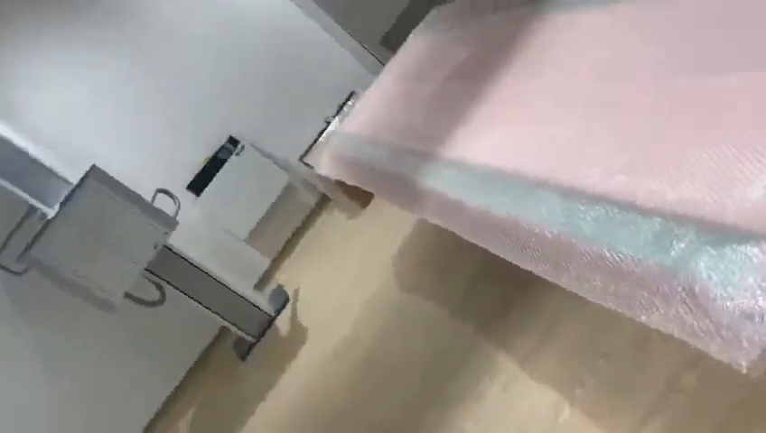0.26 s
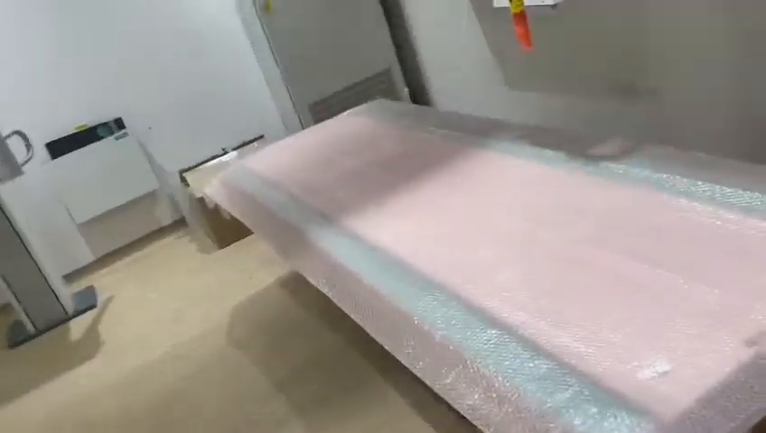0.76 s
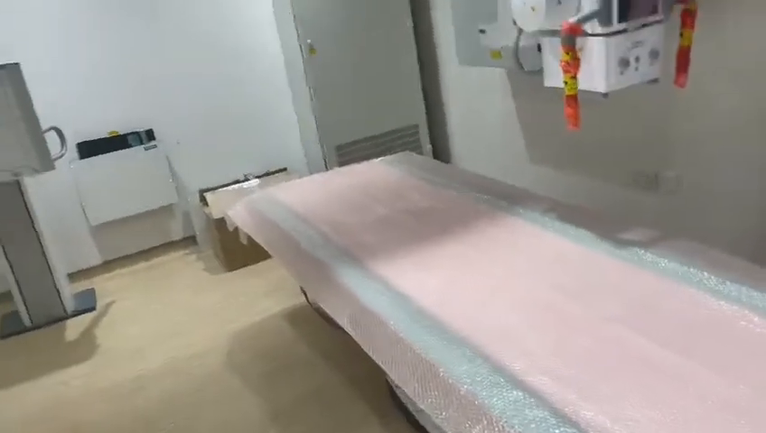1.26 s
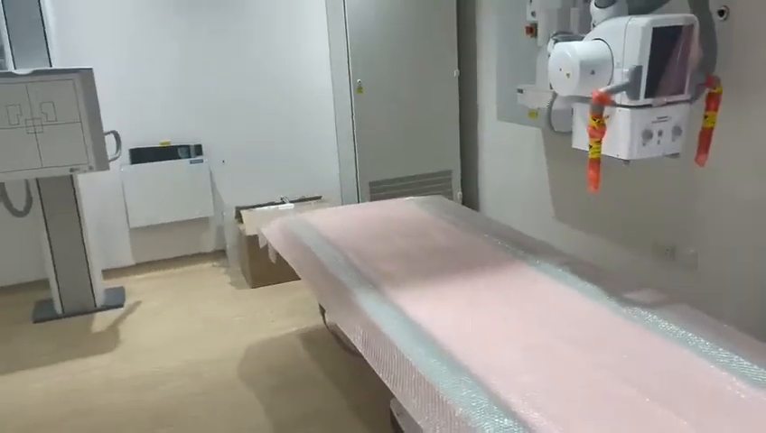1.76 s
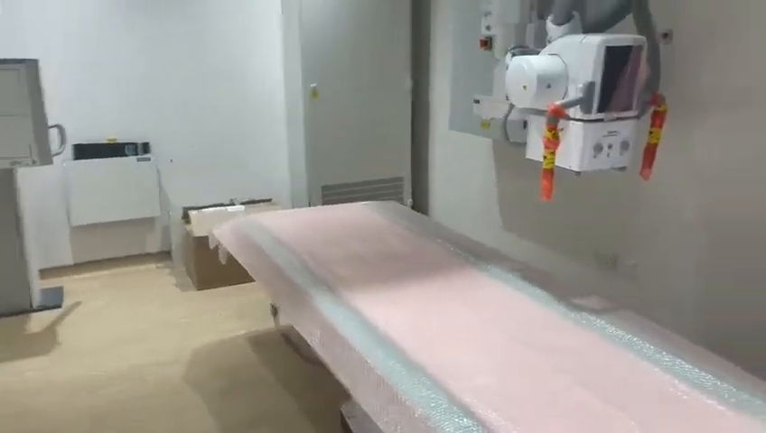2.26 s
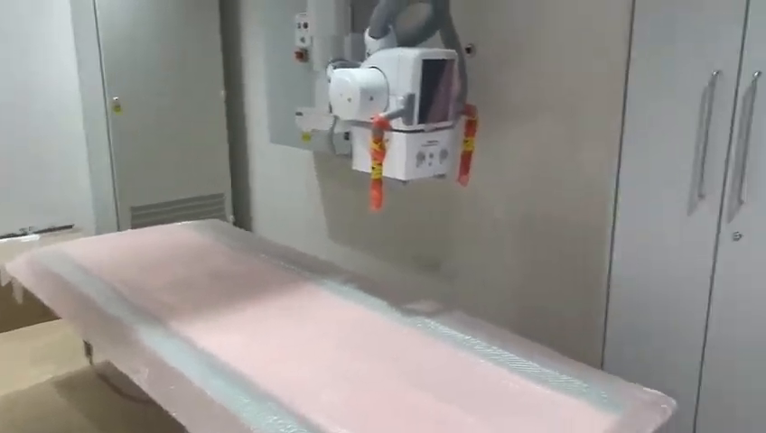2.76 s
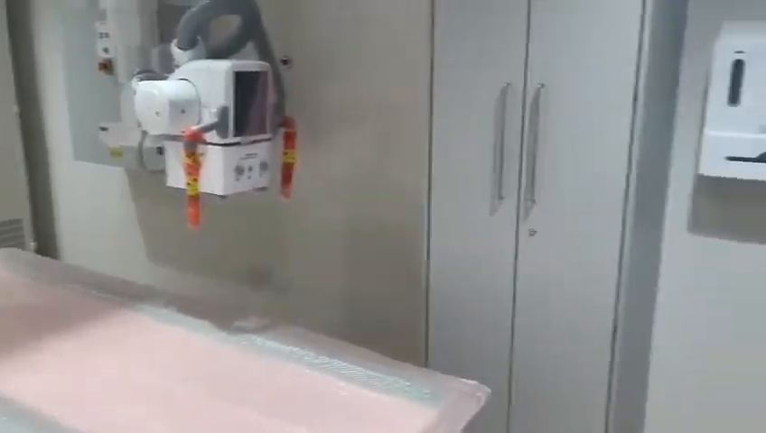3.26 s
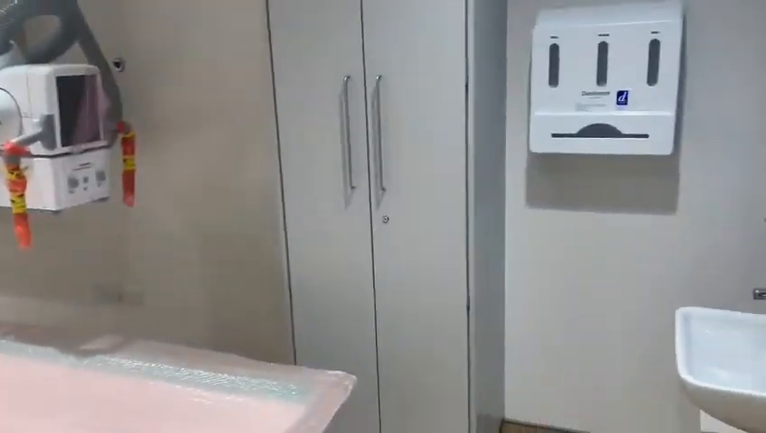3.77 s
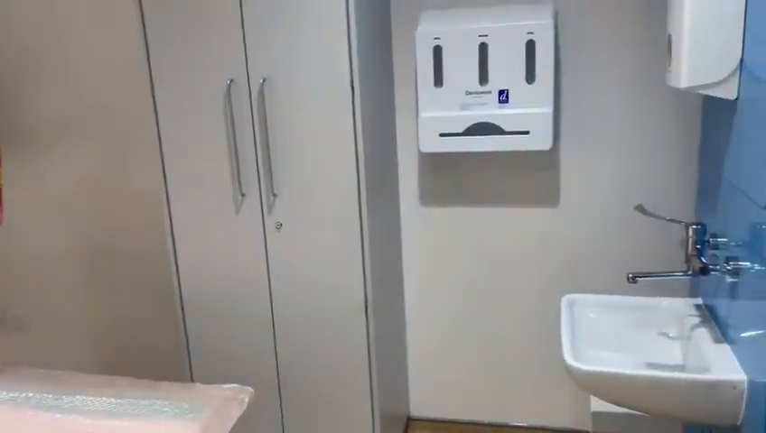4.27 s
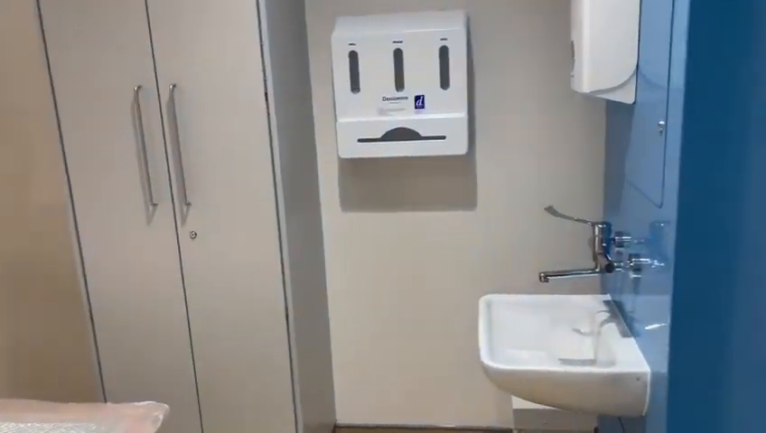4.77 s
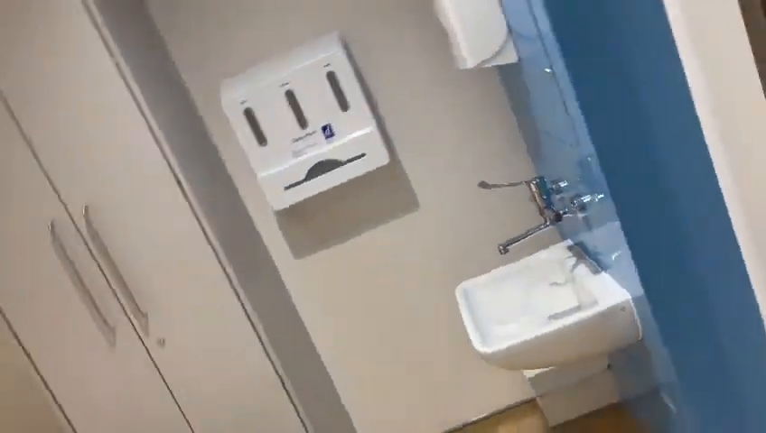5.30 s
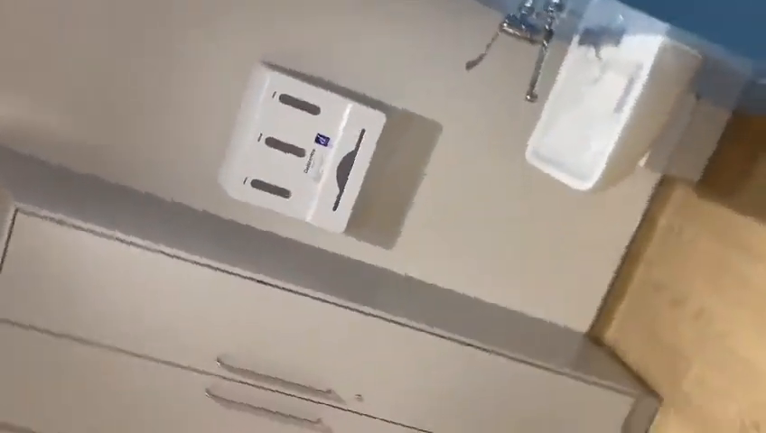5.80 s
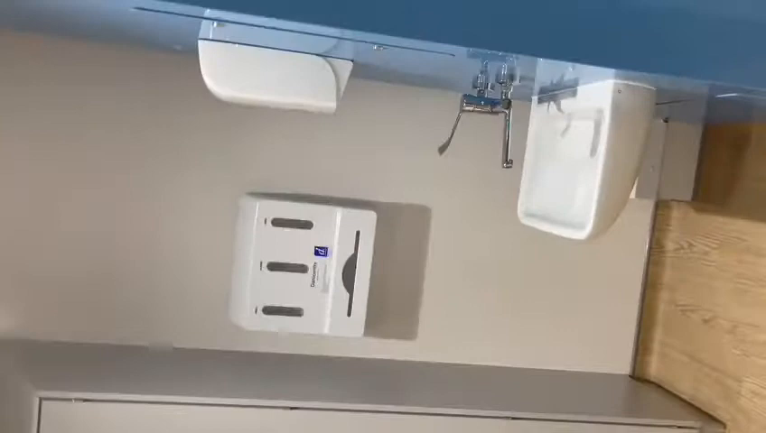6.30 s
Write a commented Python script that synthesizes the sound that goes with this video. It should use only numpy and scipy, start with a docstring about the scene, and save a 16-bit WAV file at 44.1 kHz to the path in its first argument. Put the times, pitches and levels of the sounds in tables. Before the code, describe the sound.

Ventilation hums under light phone handling, then a heavy door clicks and slams with a boom and short echo in a small room.

```python
"""Ventilation hums, sleeves rustle, and a phone rumbles and is tapped as it turns in the hand.
About four seconds in, a heavy door swings shut in a small room with hard walls. Its latch
ticks and scrapes over its plate, then the door slams and rattles. The blows make the door
boom and its metal fittings ring, and the room answers with a short echo."""
import sys
import numpy as np
from scipy import signal
from scipy.fft import rfft, irfft
from scipy.io import wavfile
from scipy.ndimage import uniform_filter1d

SR = 44100
rng = np.random.default_rng(int(sys.argv[2]) if len(sys.argv) > 2 else 0)


def wav_out(sig):
    """Save sig, one row per channel (or a flat mono array), as 16-bit PCM at SR to the path in sys.argv[1]."""
    wavfile.write(sys.argv[1], SR, np.round(np.clip(np.atleast_2d(sig).T, -1, 1) * 32767).astype(np.int16))


N = 288546
T = np.arange(N) / SR
RING_T = T[:int(1.3 * SR)]  # time since a hit, in seconds

# A "colour" says how strong a noise is at each pitch. A fade_s is the time to drop by 60 dB.
# how alike the two microphones hear a sound: pitch_hz, likeness (1 = the same)
LIKENESS = [(60, 0.95), (95, 1), (135, 0.97), (270, 0.91), (520, 0.056), (1200, 0.19), (2600, 0.53),
            (4200, 0.7), (6500, 0.73), (9000, 1)]
# the ventilation grows as the phone turns towards it: time_s, level_db
VENT_LEVEL = [(0, -49), (2.3, -49.5), (5.3, -45), (6.54, -46.5)]
# colour of the air in the ducts: pitch_hz, level_db
AIR_COLOUR = [(25, -20), (50, -7.5), (66, -1), (85, 0.5), (108, -0.5), (140, 2), (180, -4), (220, -2),
              (330, -7.5), (480, -11.5), (700, -19.5), (1300, -22.5), (2000, -29.5), (3200, -39),
              (6000, -67.5), (12000, -71.5)]
# fan tones: pitch_hz, level_db (compared with VENT_LEVEL)
FAN_TONES = [(136, -1), (205, -4)]
# hollow notes of the ducts: pitch_hz, width_hz, level_db (compared with VENT_LEVEL)
DUCT_NOTES = [(500, 120, -18), (833, 280, -17.5), (1191, 560, -15)]

# sleeve strokes as the arm turns: fastest_s, rise_s, fall_s, rustle_db, fizz_db
SLEEVE_STROKES = [(0.015, 0.026, 0.057, -60, -60.5), (0.18, 0.348, 0.066, -60, -74),
                  (0.402, 0.13, 0.059, -58.5, -61), (0.524, 0.054, 0.061, -55.5, -64),
                  (0.634, 0.144, 0.06, -57.5, -56.0), (0.829, 0.064, 0.035, -58.5, -67),
                  (0.95, 0.13, 0.28, -63.5, -64), (1.15, 0.041, 0.032, -68, -64),
                  (1.283, 0.053, 0.088, -55.5, -59.5), (1.415, 0.026, 0.081, -53.0, -55.5),
                  (1.585, 0.068, 0.047, -57.5, -60.5), (1.665, 0.014, 0.038, -63, -69),
                  (1.835, 0.11, 0.15, -55.5, -60.5), (2.017, 0.257, 0.43, -62.5, -83),
                  (2.26, 0.24, 0.038, -64, -69.5), (2.46, 0.349, 0.153, -66.0, -94),
                  (2.802, 0.16, 0.2, -60.5, -78), (2.86, 0.013, 0.052, -55, -86),
                  (3.24, 0.45, 0.63, -67.0, -88), (3.672, 0.041, 0.035, -64.0, -69),
                  (5.235, 0.04, 0.22, -55.5, -52.5), (5.49, 0.17, 0.17, -59.5, -64),
                  (5.76, 0.28, 0.18, -60, -63), (5.849, 0.038, 0.018, -57, -57.5),
                  (5.993, 0.057, 0.062, -52.5, -58.5), (6.136, 0.044, 0.03, -62, -67),
                  (6.242, 0.059, 0.21, -64.5, -66.5), (6.469, 0.17, 0.031, -59, -60.5)]
# colour of rubbing cloth: pitch_hz, level_db
CLOTH_COLOUR = [(500, 16.5), (1400, 9.5), (2200, 8), (3400, 3), (4500, 2), (6600, -0.5), (8400, -8.5),
                (9300, -7), (10800, -17), (11400, -19), (11900, -36)]
# colour of fibres in a brisk stroke: pitch_hz, level_db
FIZZ_COLOUR = [(4000, -12), (6500, -5.5), (8300, 4), (9500, 2), (11500, 5), (11900, -44)]
# the hand shifts its grip: start_s, length_s, level_db
GRIP_SHIFTS = [(.17, 0.11, -51), (.5, 0.069, -49), (.72, 0.13, -47), (.95, 0.023, -36.5), (1.1, 0.13, -49),
               (1.25, 0.153, -45), (1.48, 0.12, -51.5), (1.76, 0.03, -42), (1.83, 0.044, -41)]
# taps on the case: start_s, level_db, first_hz, last_hz, swell_s, tick_db, pan_db, left_delay_s
FINGER_TAPS = [(.1785, -37, 1900, 620, 0.0012, -35.5, 2, 0.00028),
               (0.2437, -24, 1310, 290, 0.00077, -35, 8, 0.00042),
               (.248, -25, 190, 97, 0.0052, -70, 0, 0.00023),
               (1.254, -26, 764, 568, 0.0017, -63, 9.5, 0.00081),
               (5.5661, -16, 1620, 487, 0.0017, -31, 7.5, 0.00034),
               (5.7278, -34.5, 754, 600, 0.0014, -49, 11, 0.001),
               (6.0162, -46.5, 2040, 882, 0.0014, -34.5, -10, 0.0023),
               (6.2618, -33, 2940, 1900, 0.00035, -34.5, -5, 0.00057)]
# ringing notes of the phone's case: pitch_hz, level_db, fade_s
CASE_NOTES = [(378, -2.5, 0.026), (750, -2.5, .013), (1970, -8.5, 0.006), (2740, -10, 0.012),
              (3830, -10, 0.007)]

# how long the room echoes: pitch_hz, fade_s
ECHO_FADE = [(100, 1), (400, 0.74), (1200, 0.64), (3000, 0.5), (5500, 0.45), (9000, 0.31), (11500, 0.15)]
# colour of the slam's echo off the walls: pitch_hz, level_db
WALL_COLOUR = [(60, 3.5), (150, 7), (300, -4), (520, -3), (760, -9), (1100, -7), (1750, -15.5),
               (2300, -21.5), (3000, -18.5), (3700, -25), (5000, -14), (7000, -35.5), (9200, -2),
               (9800, -18), (10700, -29), (11500, -34)]
# the case shades the microphones from the door: pitch_hz, left_minus_right_db
CASE_SHADE = [(100, -4), (350, -4), (630, -6.5), (1130, -5), (2000, -0.5), (3700, 5), (5200, 13),
              (6600, 8.5), (11000, 1.5)]
# ringing notes of the door's skin and metal fittings: pitch_hz, level_db, fade_s
FITTING_NOTES = [(384.6, -18.5, 0.1), (566.5, -25.5, 0.28), (923, -35, 0.39), (1012, -26, 0.33),
                 (1107, -18, 0.17), (1200, -27.5, 0.25), (1242, -29.5, 0.21), (1515, -26, .24),
                 (1622, -25.5, 0.27), (1722, -20, 0.31), (1803, -17.5, 0.2), (2730, -42.5, 0.42),
                 (2940, -33.5, 0.3), (3440, -27.5, 0.18), (4339, -31.5, .33), (4780, -30.5, .35),
                 (4780, -35, 0.49), (5480, -32.5, 0.36), (5650, -36, 0.3), (7400, -40, 0.26),
                 (8600, -36, .28), (8550, -28.5, .28), (9200, -35.5, 0.33), (9300, -36, 0.26),
                 (10700, -32, 0.21), (10800, -24.5, 0.15)]

# metal meets metal in the latch: start_s, level_db
LATCH_CLICKS = [(3.853, -26), (3.878, -39.5), (4.026, -35.5), (4.0322, -26), (4.038, -32), (4.0552, -24),
                (4.068, -32.5), (4.1082, -1), (4.1122, -6.5)]
# colour of those clicks: pitch_hz, level_db
CLICK_COLOUR = [(200, -30), (1000, -3.5), (2100, -1), (3600, -5.5), (5000, -1.5), (7000, -3.5), (9200, 4.5),
                (9800, -6.5), (10700, 7), (11600, -6)]
# the bolt slides over its plate: time_s, level_db
BOLT_SCRAPE = [(3.99, -74.5), (4.012, -39.5), (4.03, -33.5), (4.055, -29.5), (4.075, -27), (4.096, -39)]
# colour of the door as a sounding board for the bolt: pitch_hz, level_db
BOARD_COLOUR = [(200, -14), (600, 0.5), (1000, 4.5), (1500, -4.5), (2400, -12.5), (3500, -23), (11000, -46)]

# air squeezed through the closing gap: time_s, level_db
AIR_PUSH = [(3.95, -67.5), (4.04, -36.5), (4.075, -25.5), (4.10, -32), (4.13, -56.5)]
# the door's edge presses into its stop and bounces: start_s, pitch_hz, level_db
EDGE_KNOCKS = [(4.1043, 417, -10.5), (4.1173, 385, -27), (4.228, 400, -33), (4.242, 440, -28),
               (4.257, 480, -33)]
# deep notes of door and room: pitch_hz, level_db, fade_s, rise_s
BOOM_NOTES = [(43.6, -24, 0.63, .012), (64.8, 5, 0.41, 0.13), (73, -4.5, 0.25, 0.015),
              (89.74, 0, 0.34, 0.024), (132, -6, 0.14, 0.018), (158.7, -28, 0.54, .004),
              (249, -5.5, 0.11, 0.0061)]
# colour of wall and floor shaking: pitch_hz, level_db
THUD_COLOUR = [(22, -28), (45, -3), (62, 11.5), (100, -15.5), (170, -14), (300, -23), (600, -39.5),
               (2000, -73)]
# colour of a blow's hard crack: pitch_hz, level_db
CRACK_COLOUR = [(100, -3), (380, -3.5), (520, -7.5), (740, -7), (1100, 2), (1380, -10), (1680, 1),
                (1950, -12.5), (2300, -20), (3000, -11.5), (3650, -24), (4500, -9), (7000, -27),
                (9000, -24.5), (10700, -31.5), (11500, -35)]
# the door hits its frame: start_s, crack_db, boom_db
DOOR_BLOWS = [(4.1012, -15, -17), (4.1048, -20.5, -4.5), (4.1106, 2, 4.5), (4.1191, -12.5, -23.5),
              (4.2254, -28, -26), (4.2336, -31.5, -8.5), (4.2581, -24, -34), (4.3846, -48.5, -37),
              (4.405, -50, -26.5)]


def gain(db):
    """Turn decibels into a number to multiply by."""
    return 10 ** (np.asarray(db) / 20)


def curve(rows):
    """A gain that follows (time_s, level_db) rows and is zero outside them."""
    s, db = np.transpose(rows)
    return gain(np.interp(T, s, db)) * (T >= s[0]) * (T <= s[-1])


def at_hz(rows, hz):
    """Read between (pitch_hz, value) rows, spacing octaves evenly."""
    pitches, values = np.transpose(rows)
    return np.interp(np.log(hz + 1), np.log(pitches), values)


def pan(db):
    """Two gains that make the left side db louder than the right."""
    return gain(np.array([[db], [-db]]) / 2)


def wander(per_s):
    """A smooth random wobble that heads for a new value per_s times a second."""
    hold = int(SR / per_s)
    steps = np.repeat(rng.standard_normal(N // hold + 1), hold)
    return uniform_filter1d(uniform_filter1d(steps, hold), hold)[:N]


def noise(colour, size=N):
    """Stereo noise of a given colour, partly shared by the two microphones."""
    hz = np.fft.rfftfreq(size, 1 / SR)
    alike = np.clip(at_hz(LIKENESS, hz), 0, 1)
    shared, side = rfft(rng.standard_normal((2, size))) * gain(at_hz(colour, hz))
    x = irfft(shared * np.sqrt(1 + alike) + np.array([[1], [-1]]) * side * np.sqrt(1 - alike), size)
    return x / x.std()


def fade(fade_s):
    """A gain that drops by 60 dB every fade_s seconds."""
    return gain(-60 * RING_T / fade_s)


def strikes(times_s, levels_db):
    """One sharp push for each hit."""
    force = np.zeros(N)
    force[(np.asarray(times_s) * SR).astype(int)] = gain(levels_db)
    return force


def play(force, sound):
    """Start a copy of the sound at every push, as strong as that push."""
    return signal.fftconvolve(force[None], sound, axes=1)[:, :N]


def ventilation():
    """Air rushes dully through the ducts, fan tones waver and hollow notes swell at random."""
    air = noise(AIR_COLOUR) * gain(2 * wander(17))
    hum = hollow = 0
    for hz, db in FAN_TONES:
        level = gain(db + 3.7 * wander(10))
        wavering_hz = hz + 2.46 * wander(12)
        hum += level * np.sin(2 * np.pi * np.cumsum(wavering_hz) / SR)
    for hz, width_hz, db in DUCT_NOTES:
        rush = noise([(hz / 2, -20), (hz, 0), (hz * 2, -20)])
        note = signal.lfilter(*signal.iirpeak(hz, hz / width_hz, fs=SR), rush)
        hollow += note / note.std() * gain(db + 6.6 * wander(9))
    overall = gain(np.interp(T, *np.transpose(VENT_LEVEL)))
    return overall * (gain(3.5) * air + hum + hollow) * pan(-0.5)


def cloth_folds():
    """Cloth noise whose half-octave bands swell and fade as the folds move."""
    spectrum = rfft(noise(CLOTH_COLOUR))
    band = 2 * np.log2(np.clip(np.fft.rfftfreq(N, 1 / SR), 2000, 8000) / 2000)
    bands = (irfft(spectrum * np.maximum(1 - abs(band - k), 0), N) for k in range(5))
    return sum(x * gain(1.5 * wander(22)) for x in bands)


def sleeves():
    """Cloth rubs in uneven strokes that speed up and slow down; brisk ones add a bright fizz."""
    power = np.zeros((2, N))
    for fastest_s, rise_s, fall_s, rustle_db, fizz_db in SLEEVE_STROKES:
        width_s = np.where(T < fastest_s, rise_s, fall_s)
        speed = np.exp(-np.minimum(abs(T - fastest_s) / width_s, 10) ** 2)
        power += (gain([[rustle_db], [fizz_db]]) * speed) ** 2
    rustle_level, fizz_level = np.sqrt(power) * gain(1.45 * wander(120) + 0.93 * wander(24.79))
    rustle = gain(0.15) * rustle_level * cloth_folds()
    fizz = fizz_level * gain(1.3 * wander(45)) * noise(FIZZ_COLOUR)
    return (rustle + fizz) * pan(0.77)


def grip(rise_s=0.028, fall_s=0.023):
    """Each shift of the hand shakes the phone: a rumble swells, holds and dies away."""
    power = np.zeros(N)
    for start_s, length_s, db in GRIP_SHIFTS:
        swell = np.clip((T - start_s) / rise_s, 0, 1)
        release = np.exp(-np.maximum(T - start_s - length_s, 0) / fall_s)
        power += (gain(db) * swell * release) ** 2
    rumble = noise([(20, -32), (50, -3.5), (80, -6.5), (130, -16), (300, -64), (2000, -64.5)])
    return gain(6.5) * np.sqrt(power) * rumble


def finger_taps():
    """A tap bends the case. High waves arrive first, so each knock drops in pitch."""
    out = np.zeros((2, N))
    size = SR // 10
    for start_s, db, first_hz, last_hz, swell_s, tick_db, pan_db, left_delay_s in FINGER_TAPS:
        t = np.maximum(RING_T[:size] - np.array([[left_delay_s], [0]]), 0)
        glide_s = 0.85 * swell_s
        cycles = last_hz * t + (first_hz - last_hz) * glide_s * (1 - np.exp(-t / glide_s))
        swell = (t / swell_s * np.exp(1 - t / swell_s)) ** 0.78
        knock = gain(db) * pan(pan_db) * swell * np.sin(2 * np.pi * cycles)
        # a nail adds a tiny tick and rings the case; a fingertip hardly does
        tick = noise([(300, 21), (2800, -2), (4300, -19), (11000, -15)], size)
        tick *= gain(1.5) * np.exp(-t / 0.0046) * (t > 0)
        ring = sum(gain(note_db - 60 * t / fade_s) * np.sin(2 * np.pi * hz * t)
                   for hz, note_db, fade_s in CASE_NOTES)
        start = int(start_s * SR)
        out[:, start:start + size] += knock + gain(tick_db) * (tick + ring)
    return out


def room_echo(colour):
    """Sound bounces off the walls and blurs into an echo; higher octaves die sooner."""
    size = len(RING_T)
    spectrum = rfft(noise(colour, size))
    octave = np.log2(np.clip(np.fft.rfftfreq(size, 1 / SR), 88, 88 * 2 ** 7) / 88)
    echo = 0
    for k in range(8):
        band = irfft(spectrum * np.maximum(1 - abs(octave - k), 0), size)
        echo += band * fade(at_hz(ECHO_FADE, 88 * 2 ** k))
    build_up = 1 - np.exp(-(RING_T / 0.007) ** 2)
    return echo * build_up


def from_door(sound, left_delay_s=0.00008):
    """Door sound reaches the left microphone later, and the case shades each side differently."""
    late_left = np.interp(RING_T - left_delay_s, RING_T, sound[0], left=0)
    side_db = at_hz(CASE_SHADE, np.fft.rfftfreq(len(RING_T), 1 / SR))
    gains = gain(np.array([side_db, -side_db]) / 2)
    shade = np.roll(irfft(gains), 32, axis=1)[:, :64] * np.hanning(64)  # the gains as a short filter
    return signal.fftconvolve(np.array([late_left, sound[1]]), shade, mode="same", axes=1)


def fittings():
    """The door's skin, handle and lock ring; each note takes its own path to each microphone."""
    phases = rng.uniform(-np.pi, np.pi, (len(FITTING_NOTES), 2))
    out = 0
    for (hz, db, fade_s), (phase, apart) in zip(FITTING_NOTES, phases):
        right_shift = apart * (1 - at_hz(LIKENESS, hz)) * np.array([[0], [1]])
        out += gain(db) * fade(fade_s) * np.sin(2 * np.pi * hz * RING_T + phase + right_shift)
    return out


def latch(slips_per_s=450):
    """The bolt clicks, then sticks and slips over its plate; fittings, door and walls answer."""
    slipping = rng.random(N) < slips_per_s / SR
    scrape = gain(-8.5) * slipping * rng.standard_normal(N) * curve(BOLT_SCRAPE)
    force = strikes(*np.transpose(LATCH_CLICKS)) + scrape
    bolt = gain(-11.5) * noise(CLICK_COLOUR, len(RING_T)) * fade(0.0155)
    direct = from_door(bolt + gain(-6.5) * fittings())
    echo = gain(-21) * room_echo(CLICK_COLOUR) * pan(1.2)
    # the door carries the bolt's sound only until it shuts and the seal stills it
    board = gain(-16) * noise(BOARD_COLOUR, len(RING_T)) * fade(0.029)
    still_open = T < EDGE_KNOCKS[0][0]
    return play(force, direct + echo) + play(force * still_open, board)


def air_push():
    """The closing door squeezes a low whoosh through the gap."""
    return curve(AIR_PUSH) * noise([(25, -14.5), (90, -1), (180, -9.5), (400, -24), (1200, -26),
                                    (2300, -36), (4000, -60.5), (12000, -59)])


def rattle(start_s=4.135, hits_per_s=70, count=14, fade_s=0.56):
    """Uneven, fading pushes as the shaking door chatters against the bolt."""
    nudge, strength = rng.uniform(-1.4, 1, (count, 2)).T
    times_s = start_s + (np.arange(count) + 0.5 * nudge) / hits_per_s
    dying = gain(-60 * np.maximum(T - start_s, 0) / fade_s)
    return strikes(times_s, -25.5 + 4 * strength) * dying


def edge_knocks(swell_s=0.0033, left_delay_s=0.00063):
    """The door's edge gives short woody knocks, each stopped at once by the seal."""
    out = 0
    for start_s, hz, db in EDGE_KNOCKS:
        t = np.maximum(T - start_s - np.array([[left_delay_s], [0]]), 0)
        swell = (t / swell_s * np.exp(1 - t / swell_s)) ** 2
        out += gain(db) * swell * np.sin(2 * np.pi * hz * t)
    return out * pan(-3)


def boom():
    """Deep notes of door and room build up and die, a little out of step at the two microphones."""
    out = 0
    for hz, db, fade_s, rise_s in BOOM_NOTES:
        apart = np.arccos(np.clip(at_hz(LIKENESS, hz), 0, 1)) * np.array([[-0.5], [0.5]])
        level = gain(db) * fade(fade_s) * (1 - np.exp(-RING_T / rise_s))
        out += level * np.sin(2 * np.pi * hz * RING_T + apart)
    return out


def slam():
    """The door lands unevenly and bounces: each blow cracks, rings the fittings and booms."""
    times_s, crack_db, boom_db = np.transpose(DOOR_BLOWS)
    crack = noise(CRACK_COLOUR, len(RING_T)) * (gain(-6.5) * fade(0.024) + gain(-20.5) * fade(0.19))
    direct = from_door(crack + gain(-4.5) * fittings())
    echo = gain(-21) * room_echo(WALL_COLOUR) * pan(-0.2)
    # the frame passes the blow on to wall and floor, which shudder without a pitch
    shudder = noise(THUD_COLOUR, len(RING_T)) * fade(0.28) * (1 - np.exp(-RING_T / 0.011))
    deep = (gain(-1.1) * boom() + gain(-7) * shudder) * pan(-0.4)
    whoosh = air_push()
    cracks = play(strikes(times_s, crack_db) + rattle(), direct + echo)
    booms = play(strikes(times_s, boom_db), deep)
    return whoosh + cracks + edge_knocks() + booms


def scene():
    """The door, the hand on the phone and the ventilation together."""
    return slam() + latch() + finger_taps() + sleeves() + grip() + ventilation()


def record(dry, bass_hz=27, top_hz=11700, port_hz=10150, port_width_hz=1500, ceiling=0.85):
    """The phone cuts the deepest bass, rounds off the loudest peaks and cuts the highest treble."""
    left, right = signal.sosfilt(signal.butter(2, bass_hz, "high", fs=SR, output="sos"), dry)
    # the left microphone's opening rings near port_hz and flips the wave upside down there
    port_ring = signal.lfilter(*signal.iirpeak(port_hz, port_hz / port_width_hz, fs=SR), left)
    both = np.array([left - 2 * port_ring, right])
    rounded = both / (1 + (both / ceiling) ** 4) ** 0.25
    return signal.sosfilt(signal.ellip(12, 0.2, 100, top_hz, fs=SR, output="sos"), rounded)


dry = scene()
out = record(dry)
wav_out(out)
```